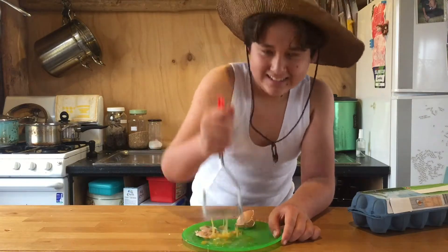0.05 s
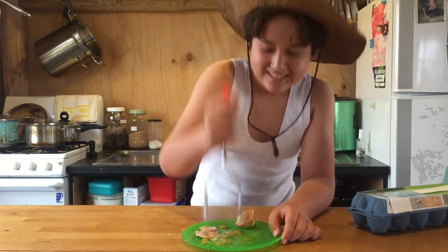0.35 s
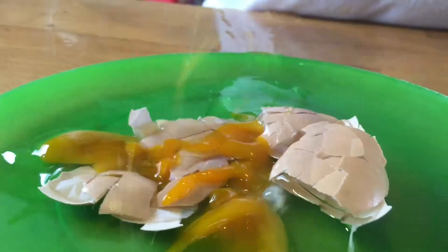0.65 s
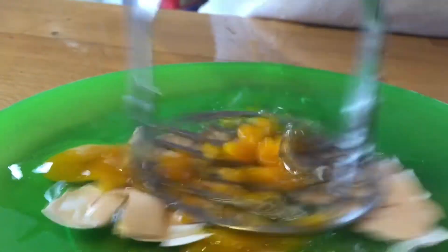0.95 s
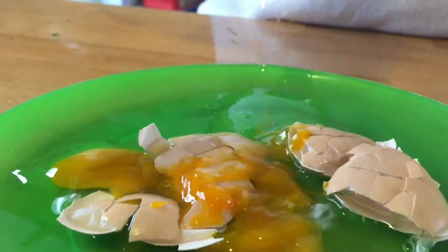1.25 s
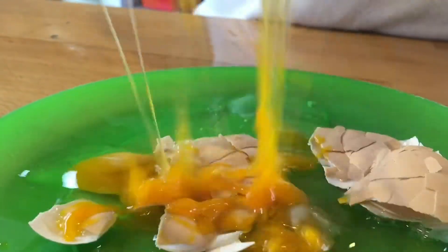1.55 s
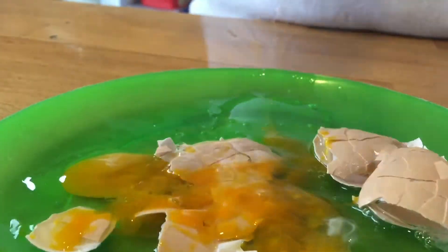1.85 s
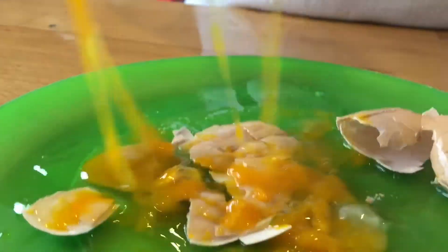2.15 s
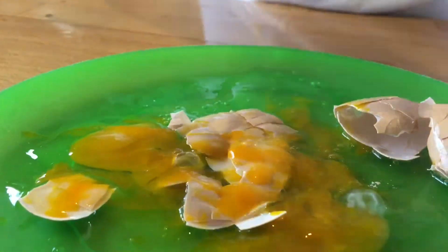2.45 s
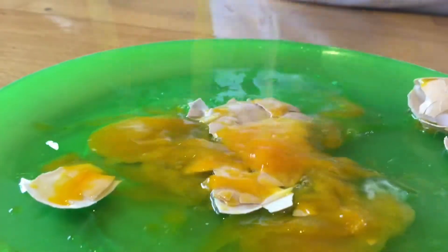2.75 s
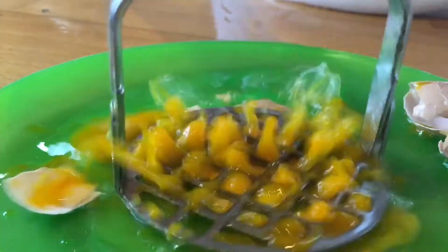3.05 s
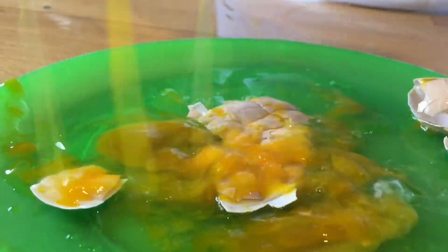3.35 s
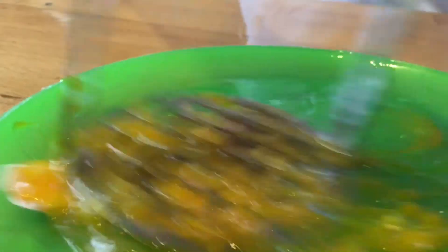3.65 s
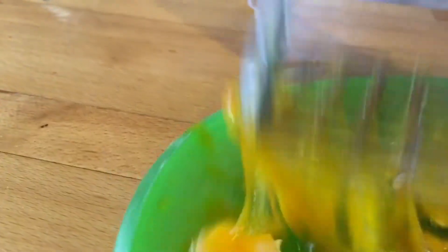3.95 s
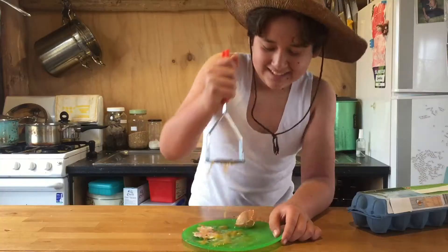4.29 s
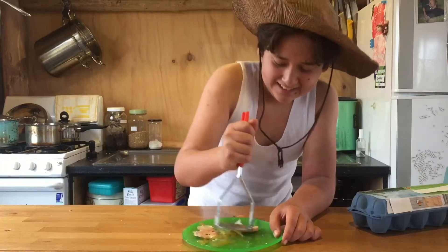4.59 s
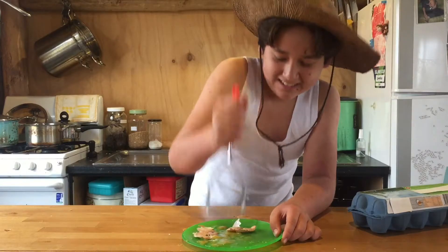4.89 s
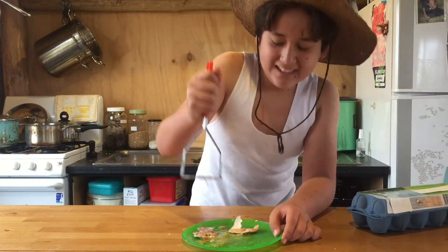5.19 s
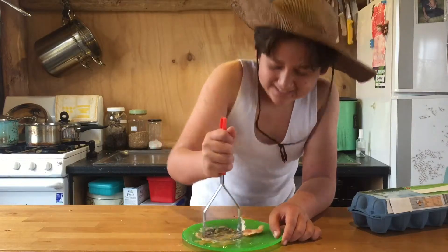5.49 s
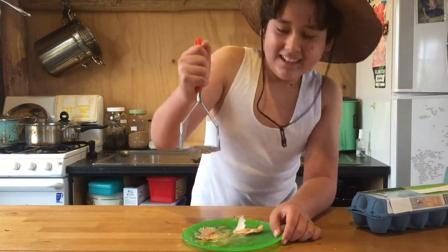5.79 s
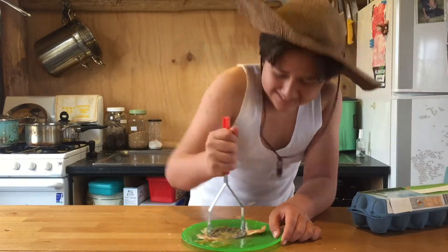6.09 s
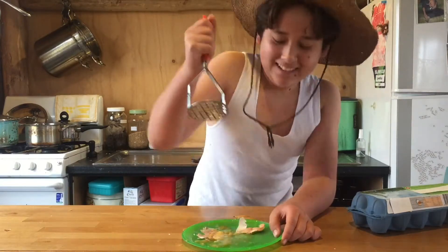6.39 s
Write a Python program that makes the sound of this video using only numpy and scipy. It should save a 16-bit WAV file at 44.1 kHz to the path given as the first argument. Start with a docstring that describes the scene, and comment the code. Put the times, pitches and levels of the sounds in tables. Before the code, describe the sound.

A steel masher smashes a raw egg on a plastic plate on a wooden bench, about twice a second. Each blow combines a wet shell crunch, a sharp clack and a low thump, with faint creaks between. The first strikes are heard from across the bench in a quiet kitchen, then from right beside the plate, heavier and slightly overloaded. The plate briefly scrapes, and lighter, more distant blows follow.

```python
"""Mashing a raw egg

A steel masher bashes an egg on a plastic plate on a wooden kitchen bench, about twice a second.
Each blow crunches shell, clacks the plate and thumps the bench; between blows the plate creaks,
and once it is dragged. The middle stretch is heard from right beside the plate, where the blows
overload the microphone; the rest from across the bench."""
import sys
import numpy as np
from scipy import signal
from scipy.fft import rfft, irfft
from scipy.io import wavfile
from scipy.ndimage import uniform_filter1d

SR = 44100
rng = np.random.default_rng(int(sys.argv[2]) if len(sys.argv) > 2 else 0)


def transcribe(u):
    """Save the signal u as a 16-bit wav file named by the first command-line argument.

    u: samples, shape (n,) or (channels, n), limited to [-1, 1]; the rate is SR.
    q: integer samples, one column per channel.
    """
    v = np.clip(np.atleast_2d(u).T, -1, 1)
    q = np.round(v * 32767).astype(np.int16)
    wavfile.write(sys.argv[1], SR, q)


N = 292383
TIME = np.arange(N) / SR
RING_TIME = TIME[:int(.7 * SR)]
CLOSE_FROM_S, CLOSE_TO_S = .682, 4.25
DRAG_START_S, DRAG_CATCH_S, DRAG_END_S = 3.68, 3.962, 4.15

# the wooden bench's modes: f/Hz, level/dB, t60/s
BENCH_MODES = [(64.74, -4.5, 0.21), (111.46, -13, 0.3), (147, -3, 0.12), (197, -1.5, 0.056), (247, -5, .12),
               (302.5, -7, 0.15), (379, -12.5, 0.13), (426, -6, 0.079)]
# perspectives, far then close: clack reverb send/dB, thud reverb send/dB, room boom/dB, air push/dB
PERSPECTIVES = [(-4.5, -5, -9, -28.5), (-18, -17, -28.5, -0.5)]


def undb(db):
    """Decibels to gain."""
    return 10 ** (np.asarray(db) / 20)


def unit(x):
    """Scale to rms 1."""
    return x / np.sqrt(np.mean(x ** 2))


def strike_level(x, db):
    """Give a hit this rms level over its first 20 ms."""
    return undb(db) * x / np.sqrt(np.mean(x[:SR // 50] ** 2))


def add(track, s, x):
    """Mix x into the track from s seconds on."""
    i = max(int(s * SR), 0)
    track[i:i + len(x)] += x[:N - i]


def through(x, response):
    """Pass x through an impulse response."""
    return signal.fftconvolve(x, response)[:len(x)]


def on_log_axis(hz, points, values):
    """Read a curve over log frequency."""
    return np.interp(np.log(hz + 1e-3), np.log(points), values)


def colour(x, spectrum, size=4096):
    """Minimum-phase EQ through points of f/Hz, level/dB."""
    curve_db = on_log_axis(np.fft.rfftfreq(size, 1 / SR), *np.transpose(spectrum))
    cepstrum = irfft(np.log(undb(curve_db)))
    cepstrum[1:size // 2] *= 2
    return through(x, irfft(np.exp(rfft(cepstrum[:size // 2], size))))


def broadband(force, size=1024):
    """Flatten a burst's spectrum so that, like one hard knock, it drives all frequencies alike."""
    power = uniform_filter1d(np.abs(rfft(force[:size])) ** 2, size=7)
    db = -10 * np.log10(power / power.mean() + 1e-3)
    return colour(force, np.transpose([np.fft.rfftfreq(size, 1 / SR), db])[1:])


def ring(modes, pitch=1, scatter_db=0, size=SR // 4):
    """Damped modes; scatter weights them anew, as each blow lands on another spot."""
    hz, db, t60 = np.transpose(modes)[:, :, None]
    polarity = (-1) ** np.arange(len(db))[:, None]
    weight = polarity * undb(db + scatter_db * rng.standard_normal(db.shape))
    t = RING_TIME[:size]
    decay = np.exp(-np.log(1000) * t / t60)
    return np.sum(weight * np.sin(2 * np.pi * hz * pitch * t) * decay, axis=0)


def grains(rate, spread_db, size=N):
    """Random tiny impacts of uneven strength, about `rate` a second."""
    strength = undb(spread_db * np.minimum(rng.exponential(size=size), 4))
    return (rng.random(size) < rate / SR) * rng.choice([-1, 1], size) * strength


def is_close(s):
    """Whether a sound starting at s rings out in the close perspective."""
    return CLOSE_FROM_S < s + .1 < CLOSE_TO_S


def room_tone():
    """Quiet, steady kitchen air: a low rumble under faint hiss."""
    # the air's spectrum: f/Hz, level/dB
    air_eq = [(25, -10), (62, 5), (110, -6), (200, -7), (400, -13), (650, -11), (900, -11.5), (1500, -9),
              (2200, -16.5), (5000, -26), (16000, -36.5)]
    return undb(-62) * unit(colour(rng.standard_normal(N), air_eq))


def kitchen_reverb():
    """Dense reflections from walls and cupboards, as an impulse response of unit energy."""
    # reverb bands: f/Hz, level/dB, t60/s
    reverb_bands = [(59.96, -2.5, 0.36), (150.4, -0.5, .34), (335, -3.5, .3), (684, 2, 0.25),
                    (1500, -7.5, 0.31), (2980, -9.5, 0.32), (6000, -4.5, 0.27), (9900, -8, 0.24),
                    (16000, -15, 0.29)]
    points, db, t60 = np.transpose(reverb_bands)
    hz, s, cells = signal.stft(rng.standard_normal(len(RING_TIME)), SR, nperseg=512)
    fade_db = on_log_axis(hz, points, db)[:, None] - 60 * s / on_log_axis(hz, points, t60)[:, None]
    tail = signal.istft(cells * undb(fade_db), SR)[1][:len(RING_TIME)]
    tail *= np.clip(RING_TIME / 0.0036 - 1, 0, 1)  # pre-delay, then fade-in
    return tail / np.linalg.norm(tail)


def radiate(force, body, db, room, send_db):
    """A body driven by a force: the direct sound, plus its own colour lingering in the room."""
    direct = strike_level(through(force, body), db)
    diffuse = through(room, body)
    out = undb(send_db) * diffuse * np.linalg.norm(direct) / np.linalg.norm(diffuse)
    add(out, 0, direct)
    return out


def creaks(close):
    """The plate sticks and slips on the wood as pressure shifts; each slip rings its damped modes."""
    # creak cues: start/s, end/s, level/dB
    creak_cues = [(0, 0.067, -51), (0.22, 0.492, -57), (0.688, 0.828, -61.5), (1.26, 1.373, -43.5),
                  (1.847, 1.906, -46.5), (4.42, 4.592, -62.5), (4.7, 4.872, -56), (5.336, 5.493, -51),
                  (5.681, 5.871, -54)]
    body = ring([(1500, -6.5, 0.018), (1720, 3.5, 0.038), (2080, -12.5, 0.0089)])
    slips = unit(through(grains(rate=700, spread_db=2.5), body))
    effort = np.zeros(N)
    for start, end, db in creak_cues:
        if is_close(start) == close:
            add(effort, start, undb(db) * signal.windows.tukey(int((end - start) * SR), .7))
    return slips * effort


def ticks():
    """Light touches of plate, shell and steel: a short ring and a speck of crackle around its pitch."""
    # touches: t/s, level/dB, f/Hz, crackle against the ring/dB
    tick_cues = [(0.7717, -48.5, 1720, -10), (0.936, -53, 1720, -30), (.95, -47, 1720, -35),
                 (0.991, -53, 1930, -21), (1.2941, -44, 1738, -15), (1.3463, -48.5, 1714, -26),
                 (1.399, -56, 1683, -16), (3.706, -50, 5650, 7.5), (3.767, -41, 1500, -10),
                 (3.788, -36, 956, -6), (3.8295, -45, 2090, 0), (3.85, -37, 900, -22),
                 (4.146, -50, 2080, -6)]
    out, t = np.zeros(N), RING_TIME[:SR // 10]
    for s, db, hz, crackle_db in tick_cues:
        tone = ring([(hz, 0, 0.026)], size=len(t)) * (1 - np.exp(-t / 0.00035))
        speck_eq = [(0.23 * hz, -10), (hz, 0), (1.4 * hz, -7), (4 * hz, -20), (9 * hz, -38)]
        speck = colour(rng.standard_normal(len(t)) * np.exp(-t / 0.0018), speck_eq)
        add(out, s, strike_level(tone, db) + strike_level(speck, db + crackle_db))
    return out


def nudges():
    """Soft pushes on the bench sound its modes, dull and short."""
    # pushes: t/s, level/dB
    nudge_cues = [(1.909, -46.5), (2.315, -45.5), (2.478, -42.5), (3.67, -35)]
    out = np.zeros(N)
    for s, db in nudge_cues:
        thud = colour(ring(BENCH_MODES, scatter_db=8.5), [(90, 1), (200, -11), (450, -15)])
        add(out, s, strike_level(thud * np.exp(-RING_TIME[:len(thud)] / 0.03), db))
    return out


def drag_swell(catch_db, rise_db_per_s, fall_db_per_s):
    """Gain of a drag layer: it grows in fits until the plate catches, then fades till the masher lifts."""
    edge_s, fit_s, waver_db = 0.0088, 0.017, 3
    gate = np.clip(np.minimum(TIME - DRAG_START_S, DRAG_END_S - TIME) / edge_s, 0, 1)
    since_catch = TIME - DRAG_CATCH_S
    slope_db = np.minimum(rise_db_per_s * since_catch, -fall_db_per_s * since_catch)
    fits = np.interp((TIME - DRAG_START_S) / fit_s, np.arange(200), rng.standard_normal(200))
    return gate * undb(catch_db + slope_db + waver_db * fits)


def drag():
    """The shoved plate scrapes, judders and catches with a bump while wet shell grinds under the grid."""
    # plastic scraping on wood: f/Hz, level/dB
    scrape_eq = [(260, -41.5), (450, -12.5), (523, -17), (609, -2.5), (667, -4.5), (1080, 1.5), (1960, -7),
                 (2370, -8.5), (5000, -39), (6500, -59.5), (11000, -120)]
    # grinding shell: f/Hz, level/dB
    grit_eq = [(2060, -16), (3500, -0.5), (4900, -10.5), (8970, -16.5), (14500, -35), (16000, -30)]
    # the juddering plate's modes: f/Hz, level/dB, t60/s
    judder_modes = [(182, -2, 0.024), (234, -0.5, 0.046), (322, -2.5, 0.025)]
    slips = grains(rate=2200, spread_db=2.6)
    grinding = grains(rate=9000, spread_db=2.2)
    out = drag_swell(-31, 59, 166) * unit(colour(slips, scrape_eq))
    out += drag_swell(-42, 110, 250) * unit(colour(grinding, grit_eq))
    bump = ring(judder_modes, size=len(RING_TIME)) * (1 - np.exp(-RING_TIME / 0.0045))
    add(out, DRAG_CATCH_S, strike_level(bump, db=-31.5))
    judder_gain = drag_swell(-39.5, 95, 74)
    judder = unit(through(grains(rate=1600, spread_db=-1), ring(judder_modes)))
    return out + judder_gain * judder


def plate_clack(focus_hz):
    """The plastic plate's ring; the struck spot favours the modes near one frequency."""
    # the plate's modes: f/Hz, level/dB, t60/s
    plate_modes = [(533, -17.5, 0.025), (777.6, -22.5, 0.0067), (851.8, -12, 0.022), (1077, -0.5, 0.0075),
                   (1295, -4, 0.023), (1420, -3.5, 0.024), (1580, -6, .03), (1690, -4, 0.024),
                   (1880, 0, 0.0062), (2187, 1.5, 0.012), (2480, -6, 0.014), (3100, -25.5, 0.0018),
                   (3640, -20, 0.015)]
    hz, db, t60 = np.transpose(plate_modes)
    favour_db = 9 * np.exp(-(np.log(hz / focus_hz) / .15) ** 2)
    return ring(np.transpose([hz, db + favour_db, t60]), scatter_db=1.5, size=SR // 10)


def blow(crunch_s, plate_db, focus_hz, crack_db, slap_db, slap_hz, bench_db, perspective):
    """The grid crushes shell for a few milliseconds, slaps the plate on the wood and shakes the bench."""
    # the steel masher's modes: f/Hz, level/dB, t60/s
    steel_modes = [(4050, -0.5, 0.005), (4500, -3, 0.021), (5270, -2, 0.012), (5692, -2, 0.032),
                   (7050, -3.5, 0.009), (8730, -8.5, 0.022), (9707, -4, 0.016), (14500, -17, .025)]
    # breaking shell and spattering egg: f/Hz, level/dB
    crack_eq = [(200, -7.5), (600, 0), (1500, 8), (2500, 4.5), (3900, -3.5), (4900, -12), (5700, -11),
                (7500, -16.5), (10000, -22), (16000, -25.5)]
    # the plate's wet floor slapping flat on the wood: multiple of slap_hz, level/dB, t60/s
    slap_modes = [(.52, -10, .04), (.92, -0.5, .028), (1.17, -1.5, 0.029), (2.1, -4.5, 0.013),
                  (2.55, -3.5, 0.018), (3.2, -5, .016)]
    clack_send_db, thud_send_db, boom_db, air_db = perspective
    t, room = RING_TIME[:SR // 4], kitchen_reverb()
    pressure = (1 - np.exp(-t / 0.00044)) * np.exp(-(t / crunch_s) ** 2)
    crunch = broadband(grains(rate=7000, spread_db=1, size=len(t)) * pressure)
    out = radiate(crunch, plate_clack(focus_hz), plate_db, room, clack_send_db)
    steel = ring(steel_modes, scatter_db=6.5, size=SR // 10)
    out += radiate(crunch, steel, crack_db - 15, room, clack_send_db - 8.5)
    # egg and splinters keep spattering after the contact
    spray = pressure + undb(-32) * np.exp(-t / 0.051)
    spatter = grains(rate=8300, spread_db=1.5, size=len(t)) * spray
    shell = colour(signal.unit_impulse(SR // 20), crack_eq)
    out += radiate(spatter, shell, crack_db, room, clack_send_db + 4)
    # wet egg cushions the slap, and the heavy bench takes longer still to get moving
    push = signal.unit_impulse(len(t))
    slap = ring(slap_modes, slap_hz, scatter_db=4.5) * (1 - np.exp(-t / 0.0019))
    out += radiate(push, slap, slap_db, room, thud_send_db - 2)
    bench = ring(BENCH_MODES, scatter_db=2) * (1 - np.exp(-t / .005))
    out += radiate(push, bench, bench_db, room, thud_send_db + 2)
    # the flexing bench top pumps air, and wakes the room's lowest standing wave
    air_push = ring([(63.1, 0, 0.3)]) * (1 - np.exp(-t / 0.0015))
    add(out, .003, strike_level(air_push, bench_db + air_db))
    standing_wave = ring([(63, 0.0035, 0.8)], size=len(RING_TIME)) * (1 - np.exp(-RING_TIME / 0.03))
    return out + undb(bench_db + boom_db) * standing_wave


def glance(db, focus_hz, perspective):
    """A light contact: mostly clack, with little weight behind it."""
    return blow(crunch_s=.0048, plate_db=db, focus_hz=focus_hz, crack_db=db - 12.5,
                slap_db=db - 26, slap_hz=360, bench_db=db - 21.5, perspective=perspective)


def bashing(close):
    """Each stroke touches first, then lands; its force sets clack, crack, slap and thump together."""
    # strokes: t/s, first touch's lead/s, crunch length/s, force/dB, shell crack against force/dB,
    # plate focus/Hz, slap pitch/Hz
    strokes = [ (0.068, .001, 0.0045, -12.5, -8.5, 1700, 310),
               (0.4955, .0025, 0.0032, -16.5, -8.5, 1500, 290), (1.036, .0098, .006, -10, -1, 840, 305),
               (1.5302, .008, .0028, -4, -9.5, 900, 339.3), (2.0670, .003, 0.0046, -8.5, 0, 1690, 339.3),
               (2.5911, 0.0035, 0.0031, -4, -7, 1089, 350), (3.1365, .002, 0.0035, -6, -9.5, 1122, 241),
               (3.5490, .004, 0.002, -10.5, 0.5, 2024, 272.6), (4.211, .002, 0.0032, -38, 6, 2100, 293),
               (4.6103, .002, 0.005, -24, -4, 2480, 338.6), (5.0351, .003, 0.0033, -10.5, -9.5, 1632, 316),
               (5.4947, .0053, 0.0028, -18, -9, 1690, 296), (6.1308, .004, 0.0032, -25, -8, 1400, 299.6)]
    # low end at full force, far then close: slap/dB, bench thump/dB
    thud_levels = [(-10.5, -24.5), (1, -21.5)]
    # masher and plate clattering around an off-centre blow: t/s, level/dB, plate focus/Hz
    clatter_cues = [(4.58, -30, 2480), (4.5889, -20, 2480), (4.6846, -24.5, 1344), (4.736, -38, 1370)]
    out, perspective = np.zeros(N), PERSPECTIVES[int(close)]
    full_slap_db, full_bench_db = thud_levels[int(close)]
    for s, lead_s, crunch_s, force_db, shell_db, focus_hz, slap_hz in strokes:
        if is_close(s) == close:
            # the first touch gives way at the same load in every stroke
            add(out, s - lead_s, glance(db=-23, focus_hz=1700, perspective=perspective))
            crack_db = force_db + shell_db
            slap_db = full_slap_db + 1.25 * force_db
            bench_db = full_bench_db + .2 * force_db
            hit = blow(crunch_s, force_db, focus_hz, crack_db, slap_db, slap_hz, bench_db, perspective)
            add(out, s, hit)
    for s, db, focus_hz in clatter_cues:
        if is_close(s) == close:
            add(out, s, glance(db, focus_hz, perspective))
    return out


def mashing(close):
    """The action from one perspective; drag, ticks and nudges are only heard beside the plate."""
    handling = creaks(close)
    if close:
        handling += drag() + ticks() + nudges()
    send_db = PERSPECTIVES[int(close)][0]
    return handling + undb(send_db) * through(handling, kitchen_reverb()) + bashing(close)


def scene():
    """The sound cuts from across the bench to beside the plate and fades back, over room tone."""
    beside = uniform_filter1d(1. * ((TIME > CLOSE_FROM_S) & (TIME < CLOSE_TO_S)), size=400)
    across = np.clip((CLOSE_FROM_S - TIME) / 0.048, 0, 1) + np.clip((TIME - CLOSE_TO_S) / 0.036, 0, 1)
    return (room_tone() + beside * mashing(close=True) + across * mashing(close=False))[None]


def record(dry):
    """The microphone loses the deepest bass, flattens the loudest peaks and cuts the top."""
    low_cut_hz, high_cut_hz = 44, 15900
    x = signal.sosfilt(signal.butter(4, low_cut_hz, "high", fs=SR, output="sos"), dry)
    clipped = x / (1 + x ** 8) ** (1 / 8)
    return signal.sosfilt(signal.ellip(10, .2, 85, high_cut_hz, fs=SR, output="sos"), clipped)


dry = scene()
out = record(dry)
transcribe(out)
```